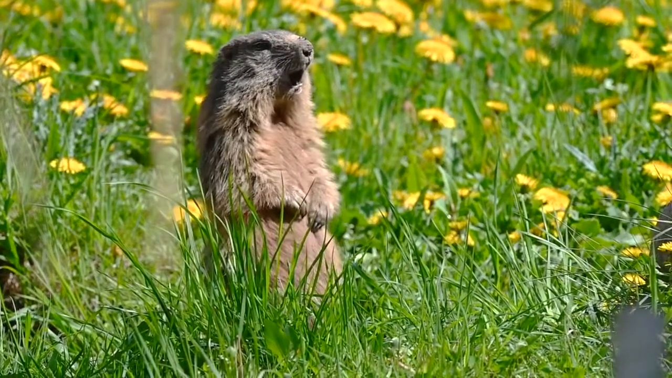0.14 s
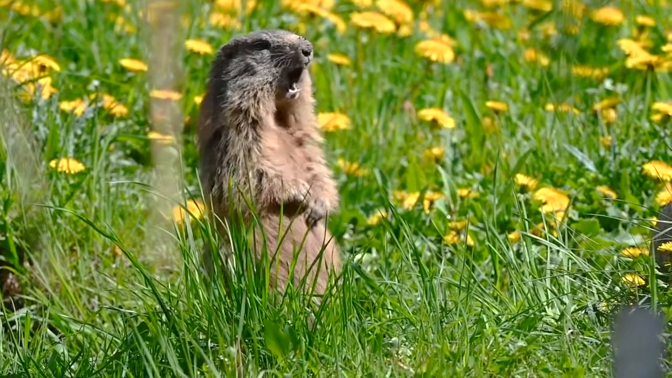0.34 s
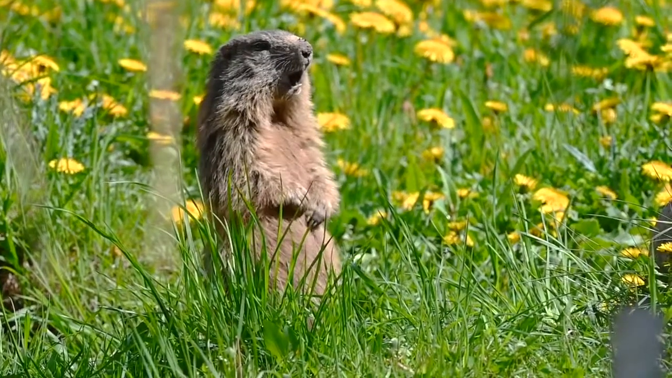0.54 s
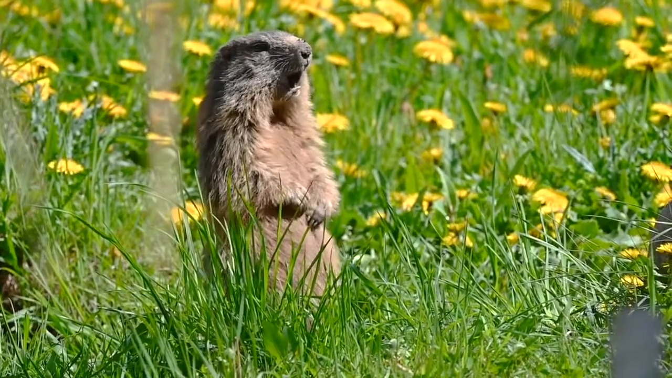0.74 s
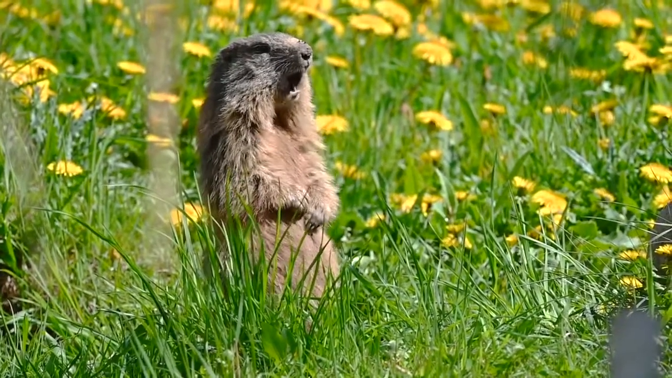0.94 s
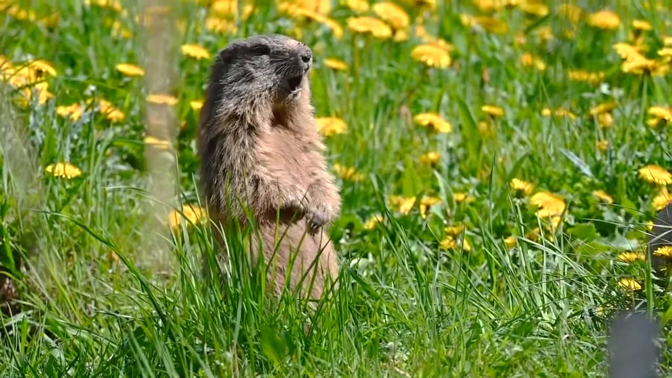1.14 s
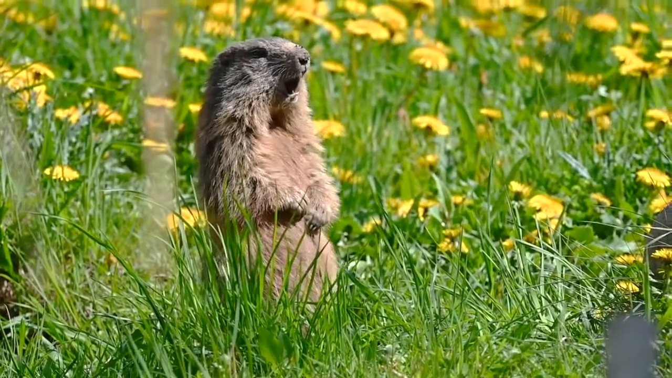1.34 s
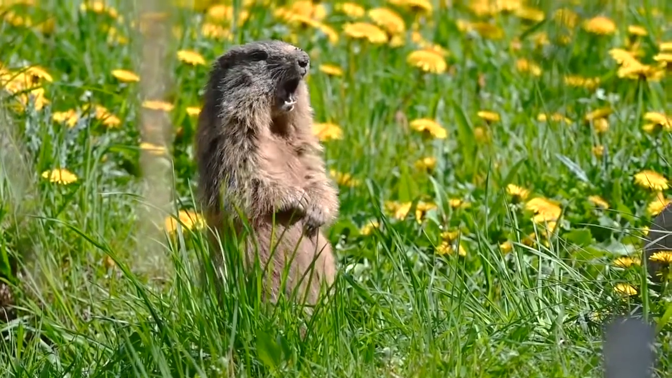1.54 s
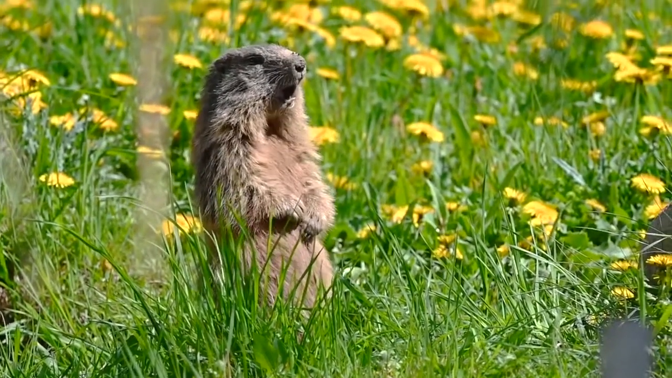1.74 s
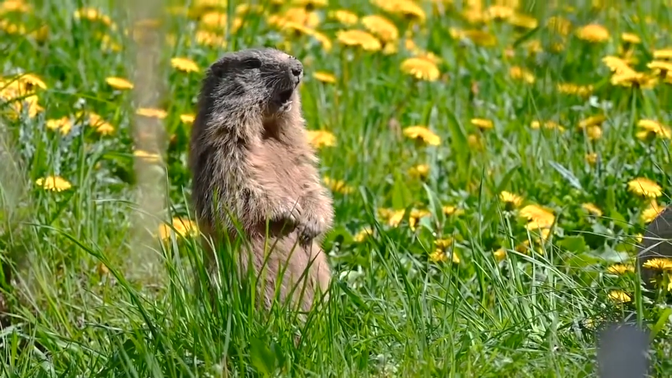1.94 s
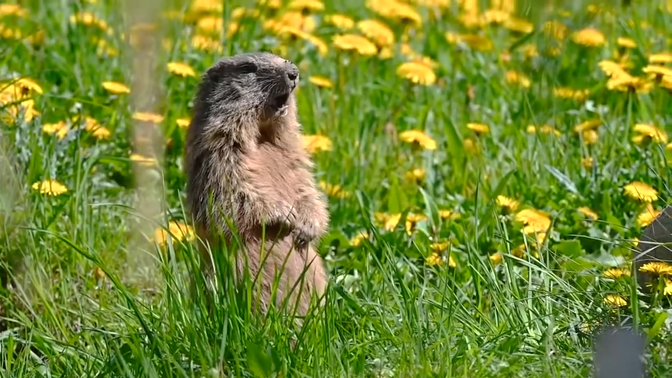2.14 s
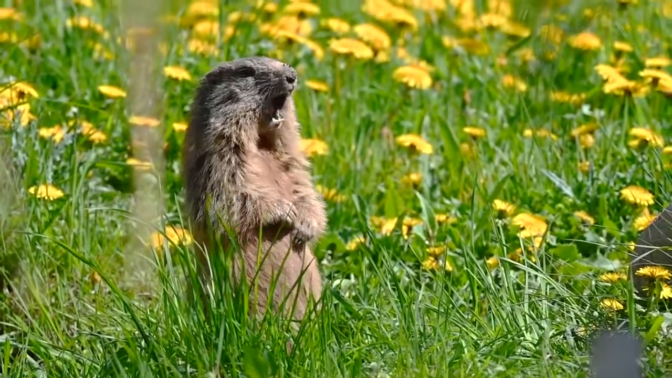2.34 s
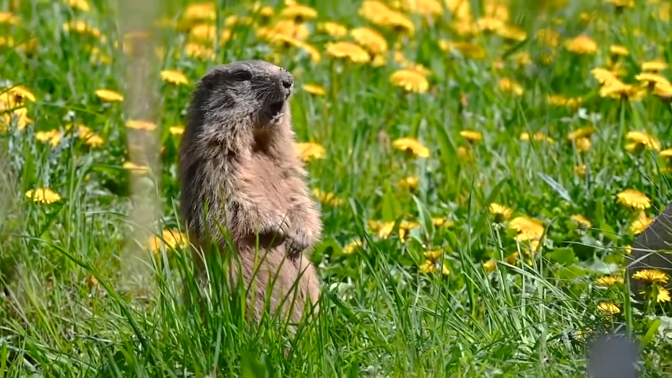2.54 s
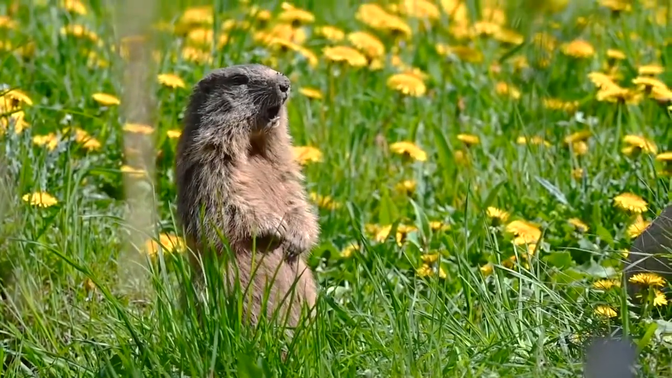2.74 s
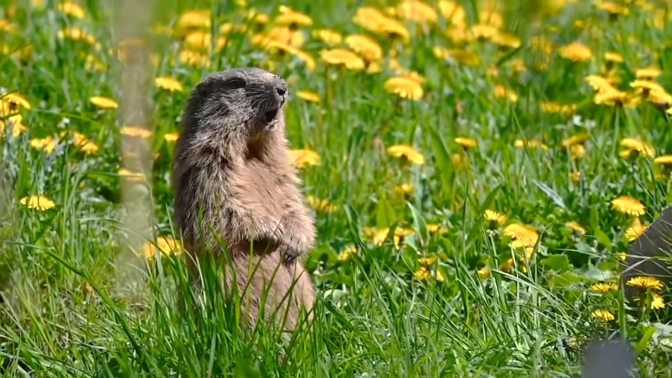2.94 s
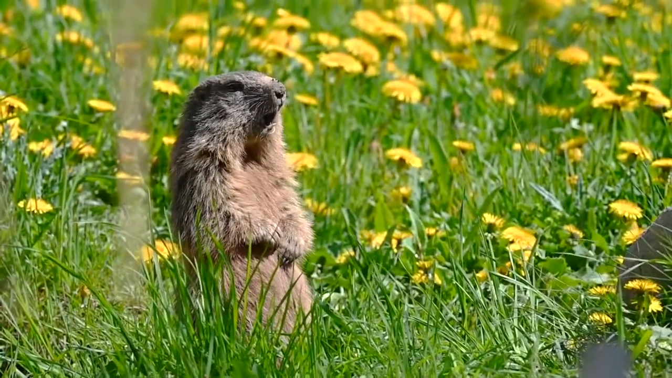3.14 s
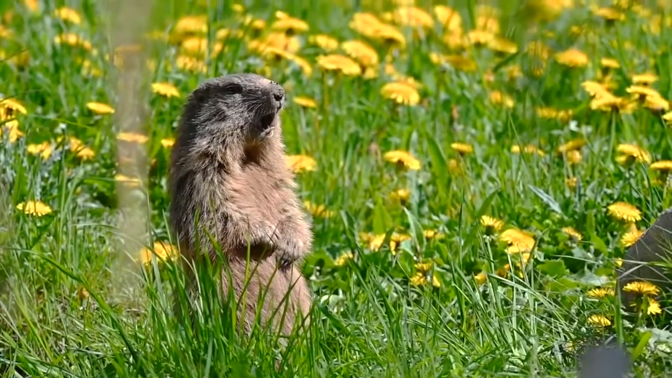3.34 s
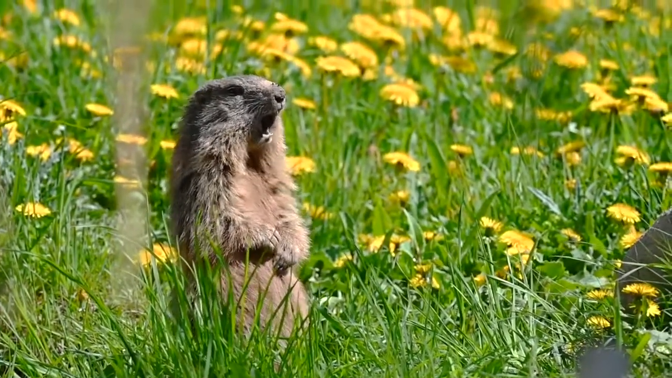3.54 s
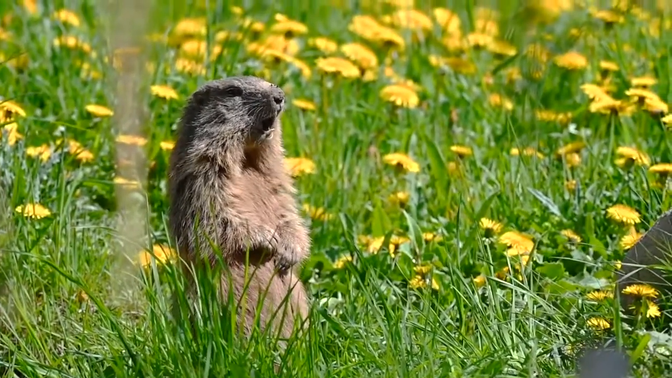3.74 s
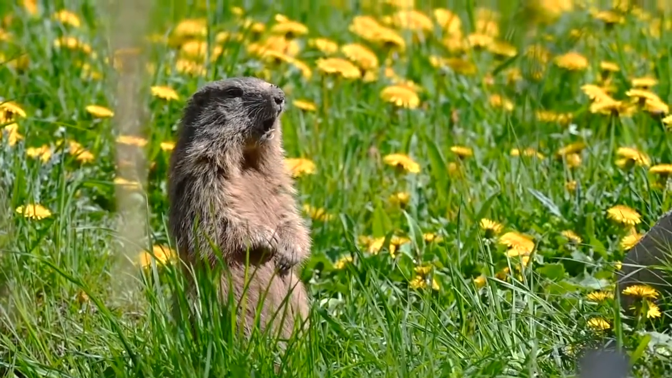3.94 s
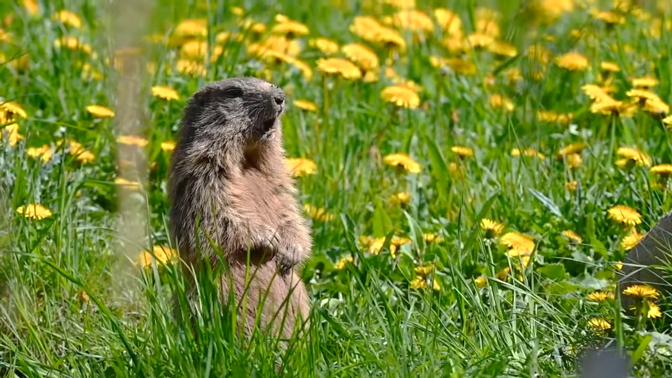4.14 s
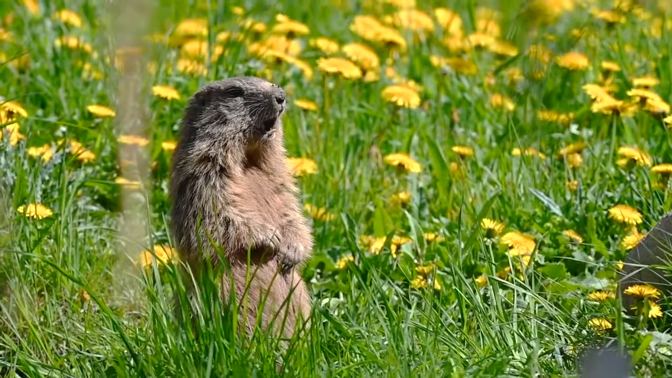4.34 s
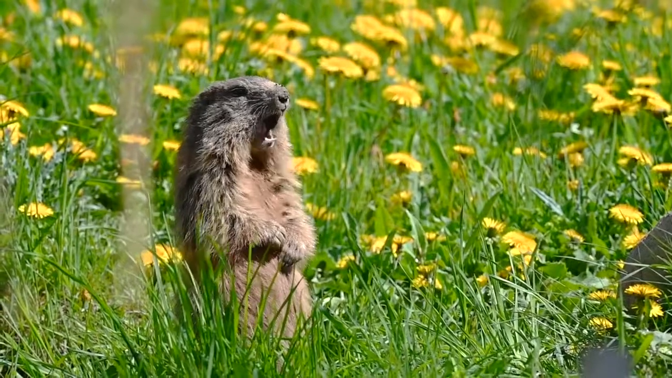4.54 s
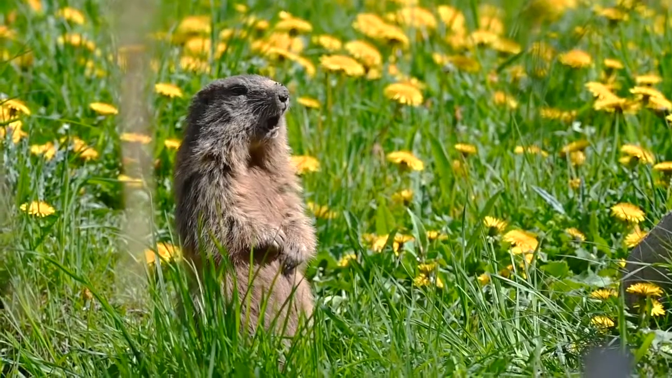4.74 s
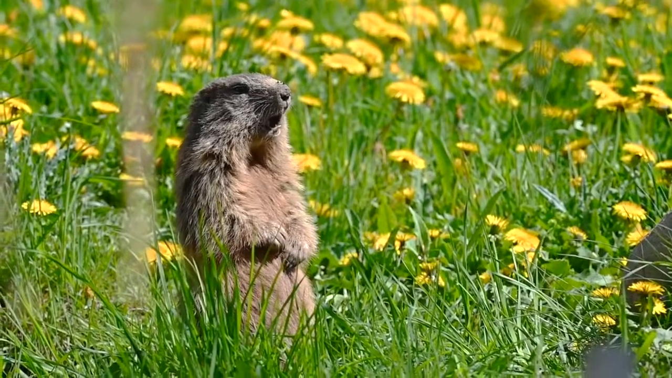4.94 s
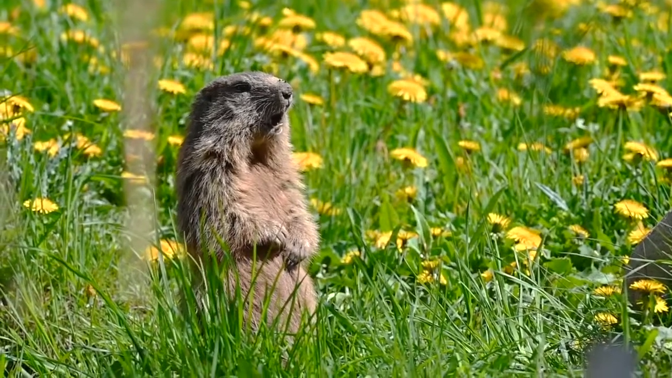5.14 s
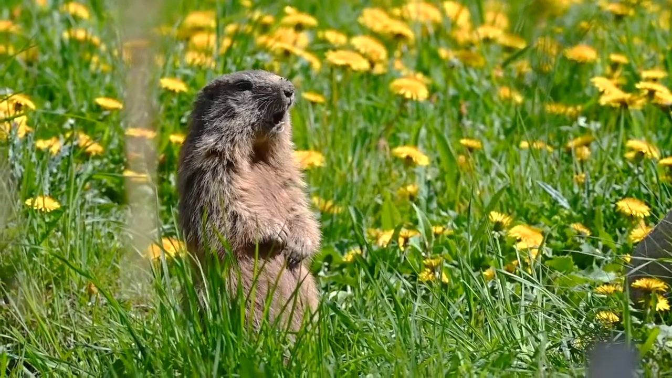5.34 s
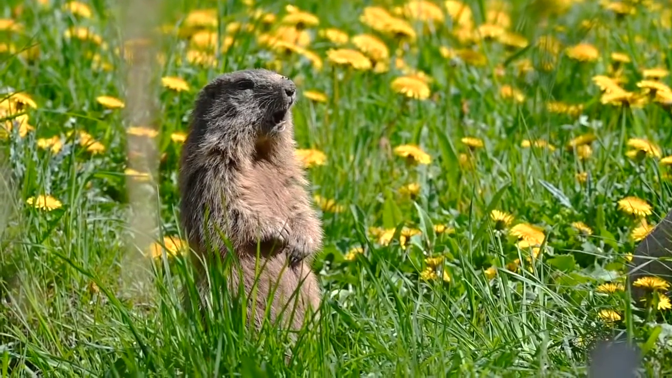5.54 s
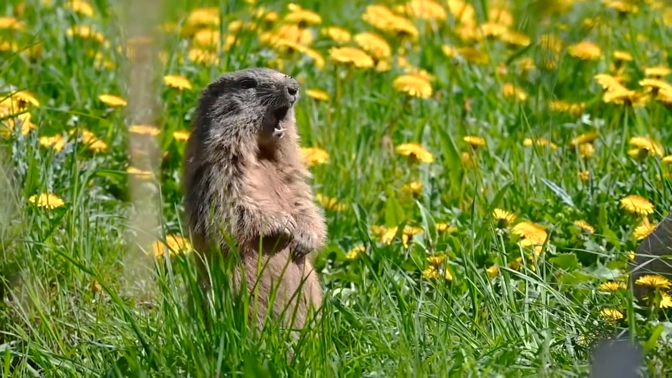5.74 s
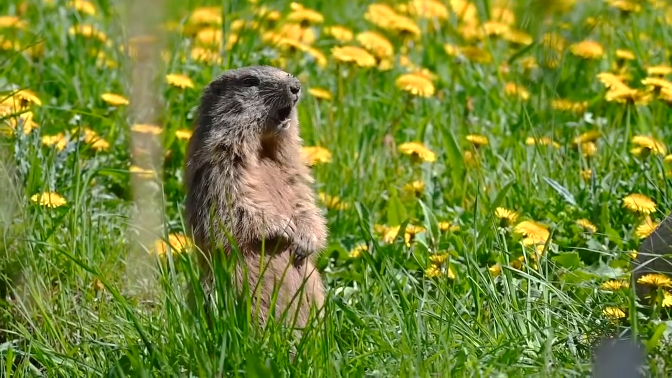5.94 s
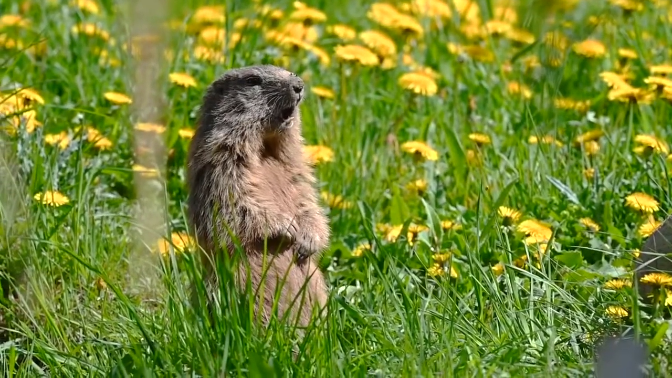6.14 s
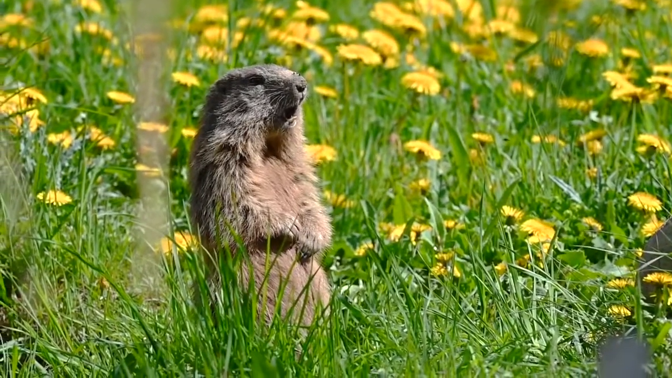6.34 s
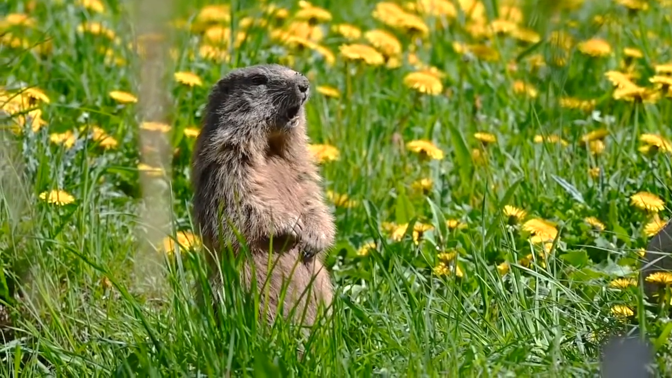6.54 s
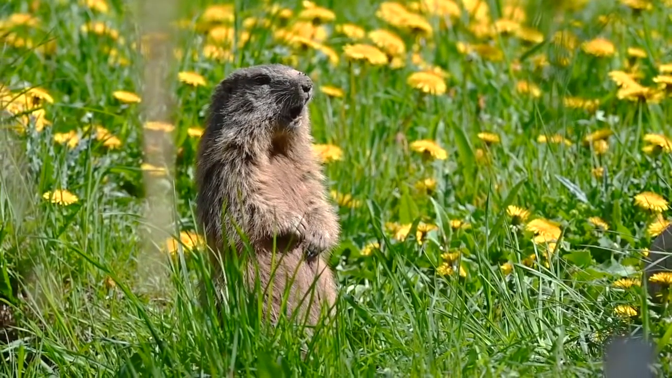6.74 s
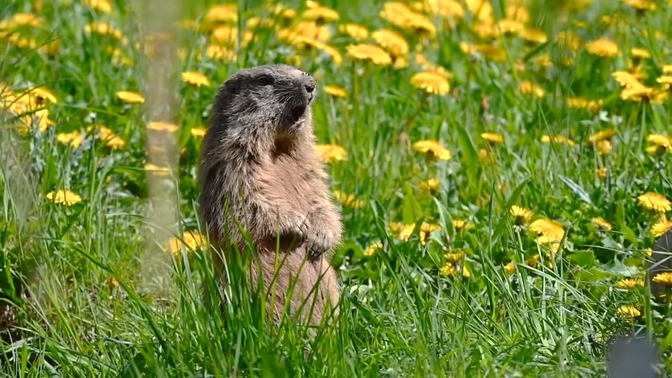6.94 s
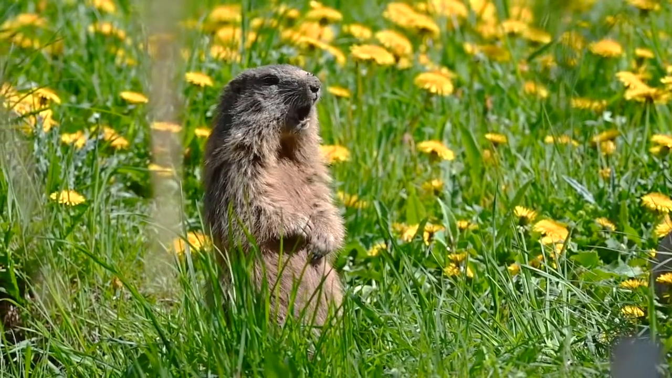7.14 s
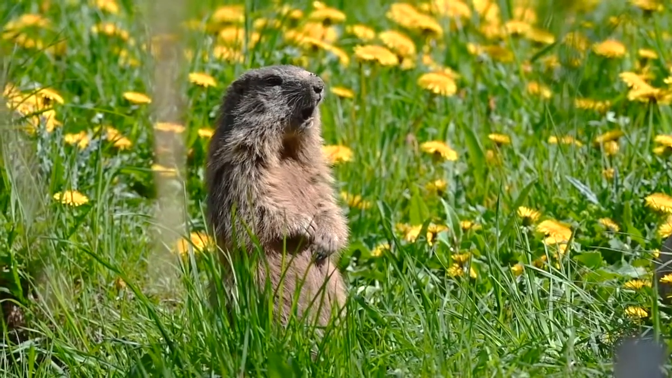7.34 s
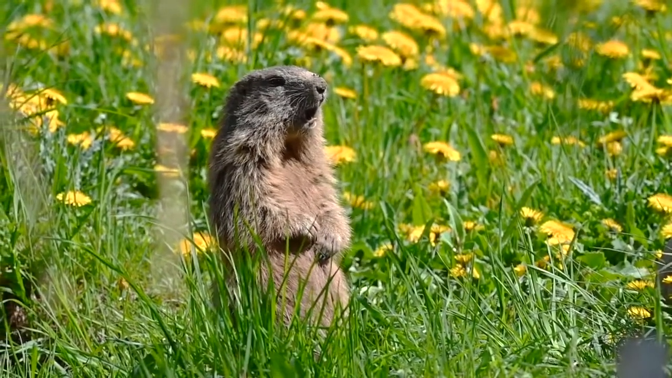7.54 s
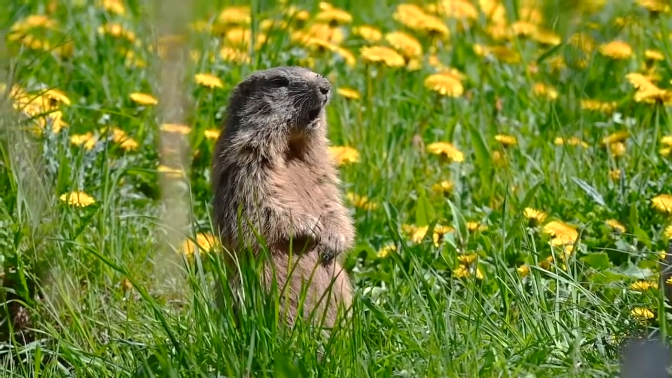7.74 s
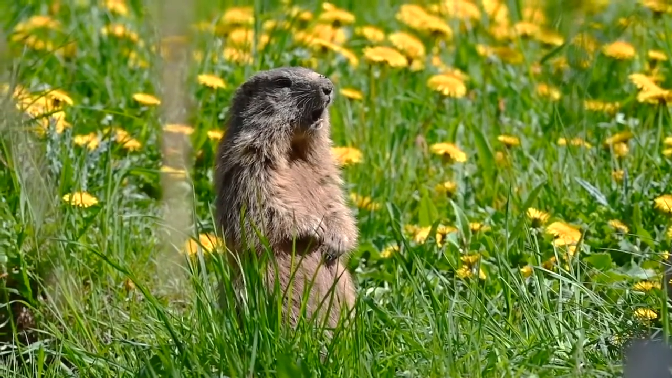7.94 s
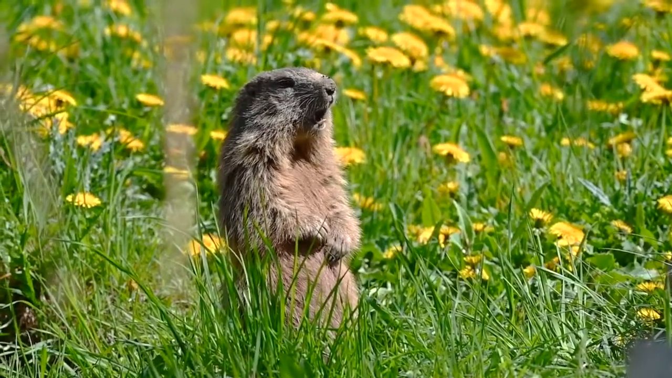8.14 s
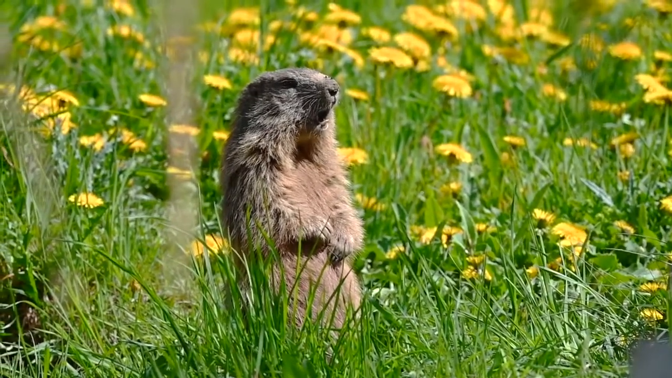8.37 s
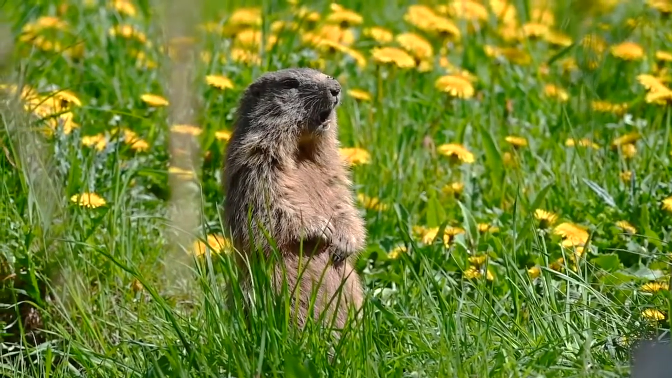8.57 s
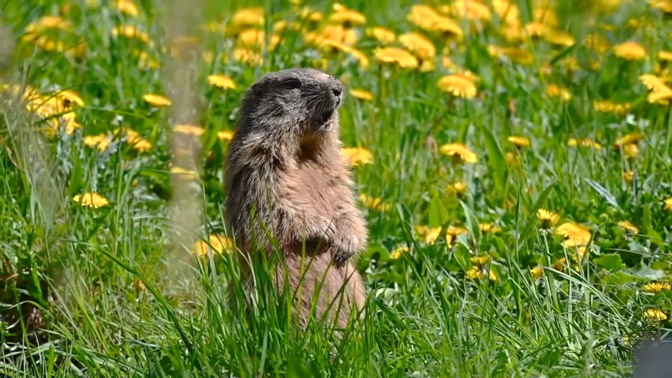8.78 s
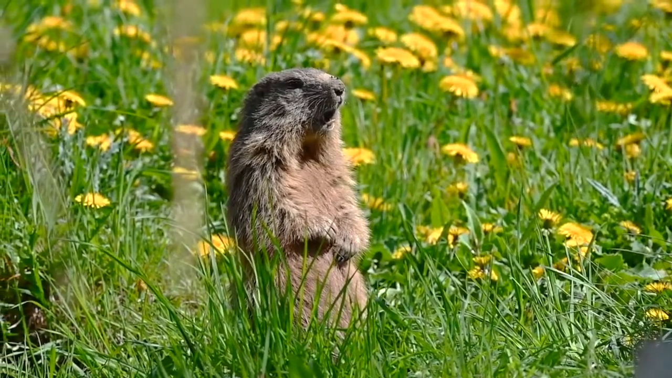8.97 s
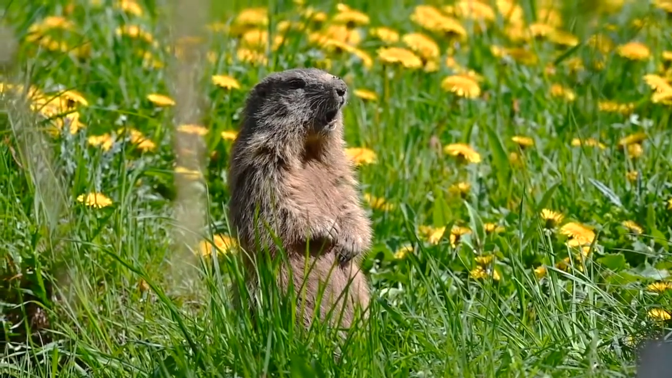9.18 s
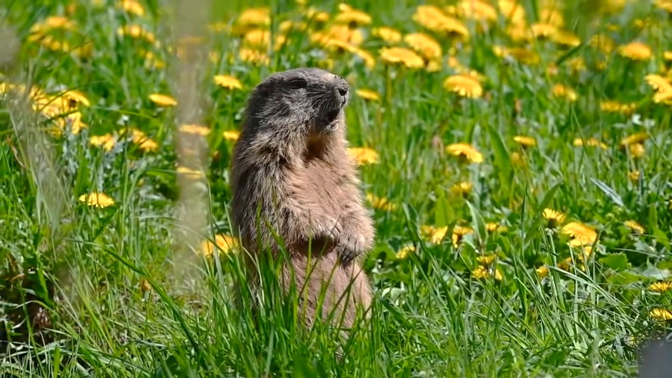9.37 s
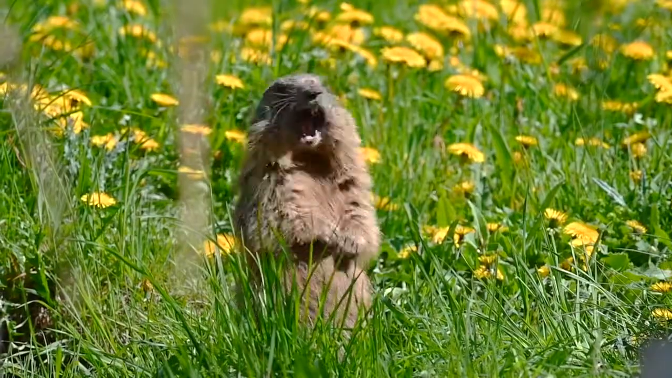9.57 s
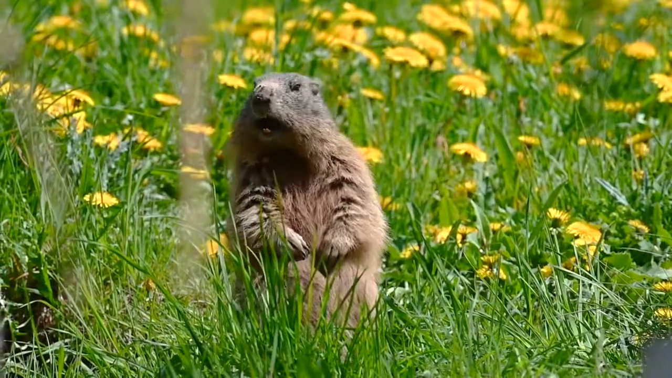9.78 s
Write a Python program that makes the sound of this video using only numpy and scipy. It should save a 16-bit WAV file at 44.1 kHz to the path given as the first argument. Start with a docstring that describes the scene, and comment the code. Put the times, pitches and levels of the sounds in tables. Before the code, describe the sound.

In an open mountain meadow, a nearby marmot repeats very short, piercing alarm whistles, each shooting up and dropping quickly with a breathy edge. Every call scatters off the ground and returns from a slope moments later. A distant vehicle swells early and drones away, small birds chirp faintly, and two soft knocks sound nearby over a low valley rush. Stereo outdoor microphone, whistles centred, echoes wide.

```python
"""Mountain meadow: a marmot gives nine shrill alarm whistles, each a quick arch of pitch with overtones and hiss.
Random reflections scatter them off the ground and throw them back from a slope about 0.3 s later.
Small birds chirp further off in slurred, fluttering tones; two soft knocks ring nearby.
A distant vehicle passes as tyre noise, whine and engine tone, and drones away.
Below lies the valley's low rush: shaped noise with a hollow band and two faint hums."""
import sys
import numpy as np
from scipy import signal
from scipy.fft import rfft, irfft
from scipy.io import wavfile
from scipy.ndimage import uniform_filter1d

SR = 44100
rng = np.random.default_rng(int(sys.argv[2]) if len(sys.argv) > 2 else 0)


def unload_audio(sound):
    """Save the sound as a 16-bit wav file, at the path given as the first command line argument."""
    columns = np.transpose(np.atleast_2d(sound))
    # keep every value between -1 and 1, then stretch to whole-number steps
    steps = np.round(np.clip(columns, -1, 1) * 32767)
    wavfile.write(sys.argv[1], SR, steps.astype(np.int16))


N = 432621
LEAD = SR // 2  # samples before time zero


def gain_of(db):
    """Decibels to gain."""
    return 10 ** (np.asarray(db) / 20)


def evened(x):
    """Scales to rms 1."""
    return x / np.sqrt(np.mean(x ** 2) + 1e-20)


def read(points, hz):
    """Interpolates a table on a log-frequency axis."""
    f, value = np.transpose(points)
    return np.interp(np.log(hz + 1), np.log(f + 1), value)


def curve(points, t, axis=1):
    """Interpolates one column of a table in time."""
    columns = np.transpose(points)
    return np.interp(t, columns[0], columns[axis])


def coloured(x, points):
    """Filters by a spectrum in dB."""
    size = x.shape[-1]
    gain = gain_of(read(points, np.fft.rfftfreq(size, 1 / SR)))
    return irfft(rfft(x) * gain, size)


def wander(size, hz):
    """Random drift, scaled to rms 1, moving up to about hz times a second."""
    span = max(size, SR // 2)
    slow = np.exp(-(np.fft.rfftfreq(span, 1 / SR) / hz) ** 2)
    drift = evened(irfft(rfft(rng.standard_normal(span)) * slow, span))
    return drift[:size]


def add(mix, start_s, sound):
    """Adds a sound to a track that begins LEAD samples early."""
    part = mix[max(round(start_s * SR) + LEAD, 0):][:len(sound)]
    part += sound[:len(part)]


def pair(a, b, same):
    """Left and right of a given likeness from two unrelated signals."""
    same = np.clip(same, -1, 1)
    shared = np.sqrt((1 + same) / 2) * a
    apart = np.sqrt((1 - same) / 2) * b
    return np.array([shared + apart, shared - apart])


def scatter(x, envelope_db, same):
    """Countless small reflections whose strength follows an envelope in dB per second of delay."""
    taps = pair(*rng.standard_normal((2, len(envelope_db))), same)
    taps = taps * gain_of(envelope_db) / np.sqrt(SR)
    return signal.fftconvolve(x[None], taps, axes=1)[:, :len(x)]


def drone(hz, level_db, waver, throb_db):
    """A far sine tone whose pitch and level waver at random."""
    phase = 2 * np.pi * np.cumsum(hz * (1 + waver * wander(N, 7.12))) / SR
    return np.sqrt(2) * np.sin(phase) * gain_of(level_db + throb_db * wander(N, 3.8))


# left-right likeness of outdoor noise: freq_hz, likeness [-1..1]
LIKENESS = [(60, 1), (130, 0.98), (260, 0.98), (560, 0.71), (1170, 0.72), (2450, 0), (5000, 0),
            (10800, 0.37)]


def rush(spectrum, patchy_db):
    """Wide outdoor noise with drifting patches in time and frequency, near mono in the bass."""
    hz = np.fft.rfftfreq(2048, 1 / SR)
    a, b, c, d, patches = rng.standard_normal((N // 512 + 6, len(hz), 5)).T
    patches = uniform_filter1d(patches, size=9, axis=0)  # across frequency
    patches = evened(uniform_filter1d(patches, size=16, axis=1))  # across time
    frames = pair(a + 1j * b, c + 1j * d, read(LIKENESS, hz)[:, None])
    frames = frames * gain_of(read(spectrum, hz)[:, None] + patchy_db * patches)
    return evened(signal.istft(frames, nperseg=2048, noverlap=1536)[1][:, :N])


# spectrum of the valley's rush: freq_hz, density_db [dB per Hz, relative]
RUSH_SPECTRUM = [(20, -3.5), (45, -0.5), (90, -3.5), (200, -6.5), (350, -12.5), (520, -12), (800, -19),
                 (1020, -16), (1500, -23), (3000, -22.5), (6000, -32.5), (10500, -44)]
# spectrum of the hollow band: freq_hz, density_db [dB per Hz, relative]
HOLLOW_SPECTRUM = [(150, -37.5), (220, -10), (280, -1.5), (340, 0.5), (410, -0.5), (520, -15), (900, -50.5)]
# swell and ebb of the hollow band: time_s, level_db [before hollow_trim_db]
HOLLOW_LEVEL = [(3.9, -51.5), (4.5, -56.0), (5.3, -44), (5.9, -53.5), (6.7, -48.5), (7.3, -54.5),
                (7.8, -45.5), (8.4, -49), (8.8, -52), (9.6, -53.5)]
# higher faint hum: time_s, pitch_hz, level_db
HIGH_HUM = [(0, 316.7, -48), (4, 317.5, -56), (9.81, 318.6, -58)]
# lower faint hum: time_s, pitch_hz, level_db
DEEP_HUM = [(0, 116, -86), (7.5, 116.1, -64), (8, 118.9, -55.5), (9.81, 119.3, -53.5)]


def valley(t, rush_db=-45, hollow_trim_db=-2):
    """Steady shaped-noise rush, a hollow band that swells and ebbs, and two wavering hums."""
    high_hum = drone(curve(HIGH_HUM, t), curve(HIGH_HUM, t, axis=2), waver=0.0018, throb_db=3)
    deep_hum = drone(curve(DEEP_HUM, t), curve(DEEP_HUM, t, axis=2), waver=.011, throb_db=4.5)
    steady = rush(RUSH_SPECTRUM, patchy_db=2.0) * gain_of(rush_db)
    hollow_db = hollow_trim_db + curve(HOLLOW_LEVEL, t)
    hollow = rush(HOLLOW_SPECTRUM, patchy_db=1.6) * gain_of(hollow_db)
    return steady + hollow + high_hum + deep_hum


def passing_db(t, nearest_s, width_s, spread_db=28):
    """Level of something passing on a straight road, against its level when nearest."""
    return -spread_db * np.log10(np.hypot(1, (t - nearest_s) / width_s))


# tyre roar spectrum: freq_hz, density_db [dB per Hz, relative]
ROAR_SPECTRUM = [(25, -10), (70, -4.5), (130, -4), (185, -7.5), (260, -0.5), (380, -10.5), (470, -9.5),
                 (700, -14), (1200, -14.5), (2000, -17.5), (4000, -27.5), (7000, -33.5), (10500, -48.5)]
# tyre roar going by: time_s, level_db [before roar_trim_db]
ROAR_LEVEL = [(0, -47), (0.35, -48.5), (0.62, -41.5), (0.9, -46), (1.2, -41.0), (1.5, -45.5), (1.8, -47.5),
              (2.2, -52.5), (3.1, -55.5)]
# engine note: time_s, pitch_hz, level_db
ENGINE_NOTE = [(0, 87, -50.5), (0.65, 87.5, -41), (0.87, 86.5, -45.5), (1.1, 84.8, -36.5),
               (1.65, 84.1, -41.5), (2, 81.8, -50.5), (2.25, 79, -46.5), (2.45, 66.3, -45),
               (2.9, 65.6, -38), (3.4, 71.3, -47), (4.2, 63.6, -47.5), (4.8, 69.6, -51.5),
               (5.35, 68.4, -46), (6, 65.3, -58.5), (6.65, 62.3, -45.5), (7.4, 63.8, -57), (8, 57.5, -54),
               (9.81, 59.5, -50)]
WHINE_HZ, WHINE_SAG_HZ_PER_S = 310.3, 21
WHINE_DB, WHINE_PEAK_S, WHINE_WIDTH_S = -39, 1.2, 0.37
RECEDE_DB_PER_S = 5  # steady roar fade after the last ROAR_LEVEL row


def vehicle(t, roar_trim_db=8):
    """Tyre roar swells past as shaped noise; tyre whine and engine tones sink as it draws away."""
    engine = drone(curve(ENGINE_NOTE, t), curve(ENGINE_NOTE, t, axis=2), waver=.012, throb_db=3.2)
    whine_hz = WHINE_HZ - WHINE_SAG_HZ_PER_S * (t - WHINE_PEAK_S)
    whine_db = WHINE_DB + passing_db(t, WHINE_PEAK_S, WHINE_WIDTH_S)
    whine = drone(whine_hz, whine_db, waver=0.02026, throb_db=2)
    recede_db = RECEDE_DB_PER_S * np.maximum(t - ROAR_LEVEL[-1][0], 0)
    roar_db = roar_trim_db + curve(ROAR_LEVEL, t) - recede_db
    return engine + whine + rush(ROAR_SPECTRUM, patchy_db=1.83) * gain_of(roar_db)


# soft knocks nearby: start_s, pitch_hz, level_db
SOFT_KNOCKS = [(3.691, 350, -30), (8.365, 380, -33.5)]


def knocks(ring_t60_s=0.052, tick_db=-7, tick_t60_s=0.051):
    """A short decaying sine ring under a soft noise tick."""
    out = np.zeros(LEAD + N)
    t = np.arange(SR // 8) / SR
    tick_spectrum = [(200, 3), (800, -2), (2000, -7), (9000, -30)]  # freq_hz, gain_db
    for start_s, pitch_hz, level_db in SOFT_KNOCKS:
        tick = evened(coloured(rng.standard_normal(len(t)), tick_spectrum))
        tick = tick * gain_of(tick_db - 60 * t / tick_t60_s)
        ring = np.sin(2 * np.pi * pitch_hz * t) * gain_of(-60 * t / ring_t60_s)
        add(out, start_s, gain_of(level_db) * (ring + tick))
    return out[LEAD:]


def note(length_s, first_hz, top_hz, last_hz, level_db, waver, second_db, crest=0.354, flutter_db=3):
    """A bird's fluttering tone with a second harmonic slurs up to a crest and down again."""
    u = np.linspace(0, 1, int(length_s * SR))
    up_hz = first_hz + (top_hz - first_hz) * np.sin(np.pi / 2 * u / crest)
    down_hz = last_hz + (top_hz - last_hz) * (1 - u) / (1 - crest)
    hz = np.where(u < crest, up_hz, down_hz) * (1 + waver * wander(len(u), 350))
    phase = 2 * np.pi * np.cumsum(hz) / SR
    tone = np.sin(phase) + gain_of(second_db) * np.sin(2 * phase)
    tone = tone * gain_of(flutter_db * wander(len(u), 110))
    return gain_of(level_db) * evened(tone) * signal.windows.tukey(len(u), .25)


# notes of one chirp: after_s, length_s, first_hz, top_hz, last_hz, level_db [relative]
CHIRP_NOTES = [(0, 0.032, 4220, 5710, 4890, -15), (0.015, .05, 3100, 4724, 3280, -6.5),
               (0.053, .046, 2900, 3650, 2750, -5.5)]
# sparrow's chirps: start_s, level_db [added to the note's level]
SPARROW_CHIRPS = [(.97, -38), (2.77, -35.5), (4.193, -36), (5.883, -35.5), (7.138, -38), (8.18, -35),
                  (9.023, -35.5)]


def sparrow(direct_db=-9, wet_db=20.0, t60_s=0.24):
    """A husky chirp of three overlapping notes from far off, blurred by reflections."""
    dry = np.zeros(LEAD + N)
    for start_s, chirp_db in SPARROW_CHIRPS:
        for after_s, *shape, note_db in CHIRP_NOTES:
            sound = note(*shape, chirp_db + note_db, waver=0.0465, second_db=-21.5)
            add(dry, start_s + after_s, sound)
    tail_db = wet_db - 60 * np.arange(SR // 2) / SR / t60_s
    return (gain_of(direct_db) * dry + scatter(dry, tail_db, same=-0.44))[:, LEAD:]


# two-note calls: start_s, top_hz, first_note_db, second_after_s, second_note_db [before direct_db]
BIRD_CALLS = [(1.971, 4720, -44.5, .052, -45), (3.872, 4650, -43, 0.052, -45.5),
              (4.72, 4360, -46.5, .068, -45), (5.176, 4300, -43, .022, -45),
              (6.236, 4360, -38.5, 0.053, -40), (7.409, 4220, -42.5, 0.056, -41.5),
              (7.898, 4600, -39.5, 0.051, -46), (8.654, 4196, -38.5, 0.072, -40),
              (9.208, 4050, -42.5, .03, -47)]
# thin high slurs: start_s, length_s, top_hz, level_db [before direct_db]
BIRD_SLURS = [(6.749, .083, 5990, -47), (6.87, 0.04, 5000, -47), (8.915, 0.029, 5250, -51)]
# length_s, then first, top and last pitch as shares of the call's top_hz
HIGH_NOTE, LOW_NOTE = (.056, .83, 1, .72), (.054, .69, .86, .62)
SLUR_SHARE = 0.63  # both ends of a slur, share of its top_hz


def songbird(direct_db=-3.0, wet_db=14, t60_s=0.22, waver=0.017):
    """Two-note calls, the second lower, and thin slurs, a little to the right, trailed by reflections."""
    dry = np.zeros(LEAD + N)
    for start_s, top_hz, high_db, after_s, low_db in BIRD_CALLS:
        notes = [(start_s, HIGH_NOTE, high_db), (start_s + after_s, LOW_NOTE, low_db)]
        for note_s, (length_s, *shares), level_db in notes:
            pitches_hz = top_hz * np.array(shares)
            add(dry, note_s, note(length_s, *pitches_hz, level_db, waver, second_db=-30))
    for start_s, length_s, top_hz, level_db in BIRD_SLURS:
        end_hz = SLUR_SHARE * top_hz
        add(dry, start_s, note(length_s, end_hz, top_hz, end_hz, level_db, waver, second_db=-48))
    tail_db = wet_db - 60 * np.arange(SR // 2) / SR / t60_s
    ports = np.array([np.roll(dry, 4), dry])  # left 4 samples late
    return gain_of(direct_db) * (ports + scatter(dry, tail_db, same=-0.28))[:, LEAD:]


# voice turns pure as it climbs: pitch_hz, second_harmonic_db [against the first]
SECOND_HARMONIC = [(1250, -8), (1600, 2), (1950, -6), (2380, -3.5), (2600, -13), (2800, -21), (3000, -31.5),
                   (3300, -28.5), (3480, -24)]
# hiss sounding along with the whistle: freq_hz, density_db [dB per Hz, relative]
HISS_SPECTRUM = [(900, -28), (2200, 0), (3200, 16), (4200, -5.5), (5500, 4.5), (7400, -12), (8700, -19),
                 (11000, -14)]
# notch in the mouth's response: freq_hz, gain_db
MOUTH_RESPONSE = [(7100, 0.5), (7600, -9), (8300, -19), (9400, -12), (10500, 0)]
# pitch climbs from a share of its top, levels off, then sinks ever faster
START_SHARE, CLIMB_S, CLIMB_POWER = .355, .0178, 1.6
RISE_S, DROP_SHARE, DROP_POWER = .049, .27, 1.75
# level starts soft, opens to full voice with a brief accent, then fades out
HISS_LEAD_S, ATTACK_S, FADE_S = .009, 0.0056, 0.02
SOFT_DB, OPENS_S, OPENING_S = -11.5, 0.011, .0015
ACCENT_DB, ACCENT_S, ACCENT_WIDTH_S = 5, 0.023, 0.007


def whistle(fall_s, top_hz, level_db, sag_db, dull_db, jitter=0.0049, rasp=0.05, rasp_s=0.007,
            rasp_width_s=0.019, third_db=-10, hiss_db=-23.5, onset_hiss_db=-19.0, shimmer=0.12):
    """Hiss leads in; the voice starts low and raspy, shoots to a pure top, sinks as pressure runs out."""
    t = np.arange(-HISS_LEAD_S, RISE_S + fall_s + FADE_S / 4, 1 / SR)
    spent = np.maximum(t - RISE_S, 0) / fall_s  # pressure used up
    climb = 1 - (1 - START_SHARE) * np.exp(-(np.maximum(t, 0) / CLIMB_S) ** CLIMB_POWER)
    hz = top_hz * climb * (1 - DROP_SHARE * spent ** DROP_POWER)

    shut = (1 - np.tanh((t - OPENS_S) / OPENING_S)) / 2
    accent = np.exp(-((t - ACCENT_S) / ACCENT_WIDTH_S) ** 2)
    force_db = level_db + SOFT_DB * shut + ACCENT_DB * accent - sag_db * spent
    force = gain_of(force_db) * np.clip(t / ATTACK_S + .5, 0, 1)
    release = np.sin(np.pi / 2 * np.minimum((t[-1] - t) / FADE_S, 1)) ** 2

    # the folds beat unevenly at first
    unsettled = np.exp(-((t - rasp_s) / rasp_width_s) ** 2) * np.minimum(1 + t / HISS_LEAD_S, 1)
    uneven_hz = hz * (1 + (jitter + rasp * unsettled) * wander(len(t), 700))
    phase = 2 * np.pi * np.cumsum(uneven_hz) / SR
    force = force * (1 + shimmer * unsettled * wander(len(t), 630))

    second = gain_of(read(SECOND_HARMONIC, hz) - dull_db * spent)
    third = gain_of(third_db) * second * np.sqrt(second)
    harmonics = [1, second, third]
    voice = np.sqrt(2) * sum(size * np.sin((k + 1) * phase) for k, size in enumerate(harmonics))

    noise = evened(coloured(rng.standard_normal(len(t)), HISS_SPECTRUM))
    voiced_hiss = force * gain_of(hiss_db - dull_db * spent)
    onset_hiss = unsettled * gain_of(level_db + onset_hiss_db)
    hiss = noise * (voiced_hiss + onset_hiss)
    return t[0], (coloured(force * voice, MOUTH_RESPONSE) + hiss) * release


# rough surfaces (ground, nearer rise, far slope): delay_s, level_db [dB per s of delay], build_s, t60_s
SURFACES = [(.004, 5.5, .02, .18), (0.109, -12.5, 0.25, 0.59), (.274, -10.5, 0.34, 0.37)]


def echo_db(delay_s):
    """Each surface's echo builds up to its own delay and dies away; their powers add."""
    power = 0
    for at_s, level_db, build_s, t60_s in SURFACES:
        away = np.maximum((at_s - delay_s) / build_s, (delay_s - at_s) / t60_s)
        power = power + gain_of(level_db - 60 * away) ** 2
    return 10 * np.log10(power)


# whistles; the first, before time zero, is heard only as an echo:
# start_s, fall_s, top_hz, level_db, sag_db [in the fall], dull_db [extra sag of overtones and hiss]
WHISTLE_CALLS = [(-.255, 0.057, 3538, -19.5, -1, 5), (.218, .032, 3454, -17, 8, 11),
                 (0.7767, 0.035, 3453, -17, 7.5, 6), (1.42, 0.04, 3461, -17, 7.5, 10),
                 (2.267, 0.04, 3466, -17, 4.5, 5), (3.380, .051, 3505, -17.5, 4.5, 4),
                 (4.409, 0.045, 3488, -17, 5.5, 4), (5.678, 0.044, 3494, -17, 6.5, 2),
                 (6.938, 0.048, 3489, -16.5, 6, 4), (9.458, 0.056, 3535, -16.5, 2.5, -4)]
# overtones beam away from the listener and return mostly as echo: freq_hz, gain_db
ECHO_SPECTRUM = [(1000, -36), (2300, -5.5), (2750, 4), (3250, 4.5), (3500, 8.5), (4600, -26.5), (5500, 5),
                 (6100, 12.5), (7000, 7), (10000, -20)]
# treble difference of the two microphone ports: freq_hz, left_above_middle_db
PORT_LEAN = [(1200, 0.5), (2000, 0.5), (2650, 0.3), (3300, .7), (4500, 2.5), (8000, -1.7), (10500, -2)]
BOUNCE_S, BOUNCE_DB = .00377, -15  # one mirror reflection off the ground close by


def marmot(near_same=-0.31, far_same=-0.38, echo_right_db=1.74):
    """Whistles straight ahead, with ground scatter and slope echo drawn at random for each whistle."""
    dry, echo = np.zeros(LEAD + N), np.zeros((2, LEAD + N))
    delay_s = np.arange(3 * SR // 4) / SR
    same = far_same + (near_same - far_same) * np.exp(-delay_s / .04)  # reflections arrive from the sides
    for start_s, *call in WHISTLE_CALLS:
        early_s, sound = whistle(*call)
        add(dry, start_s + early_s, sound)
        thrown = coloured(np.pad(sound, (0, SR - len(sound))), ECHO_SPECTRUM)
        for side, tail in zip(echo, scatter(thrown, echo_db(delay_s), same)):
            add(side, start_s + early_s, tail)
    at = np.arange(len(dry))
    near = dry + gain_of(BOUNCE_DB) * np.interp(at - BOUNCE_S * SR, at, dry)
    right_lean = [(hz, -db) for hz, db in PORT_LEAN]
    direct = np.array([coloured(near, PORT_LEAN), coloured(near, right_lean)])
    return (direct + echo * gain_of([[-echo_right_db], [echo_right_db]]))[:, LEAD:]


def scene():
    """Everything in the meadow, background first."""
    t = np.arange(N) / SR
    return valley(t) + vehicle(t) + knocks() + sparrow() + songbird() + marmot()


EDGE_HZ = 10900


def record(dry):
    """The recorder's band limit: a linear-phase low-pass."""
    lowpass = signal.firwin(401, EDGE_HZ, window=("kaiser", 9), fs=SR)
    return signal.oaconvolve(dry, lowpass[None], "same")


dry = scene()
out = record(dry)
unload_audio(out)
```